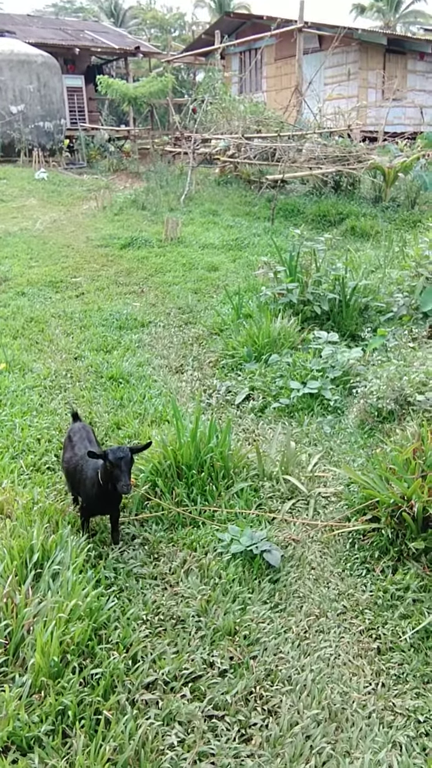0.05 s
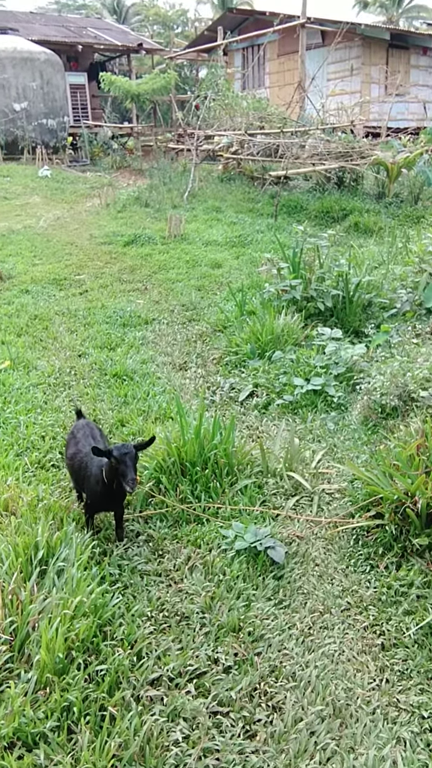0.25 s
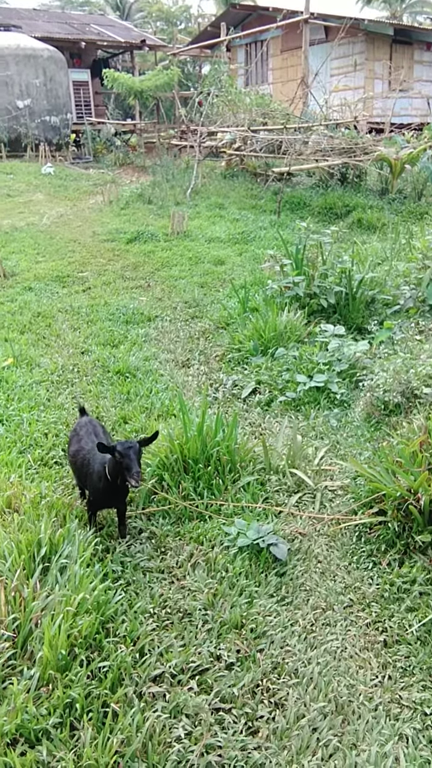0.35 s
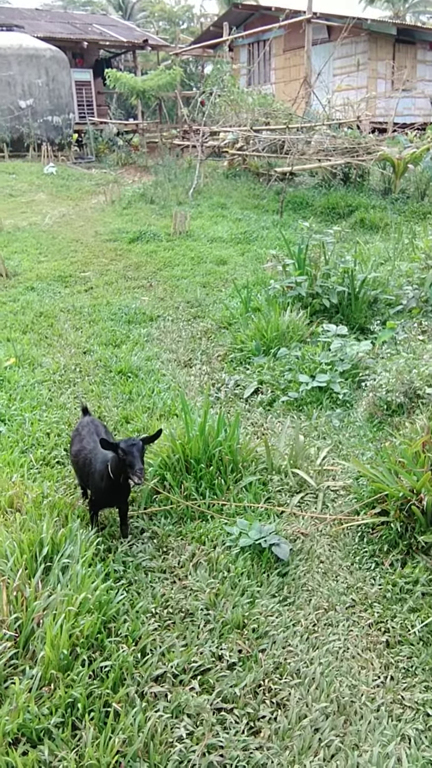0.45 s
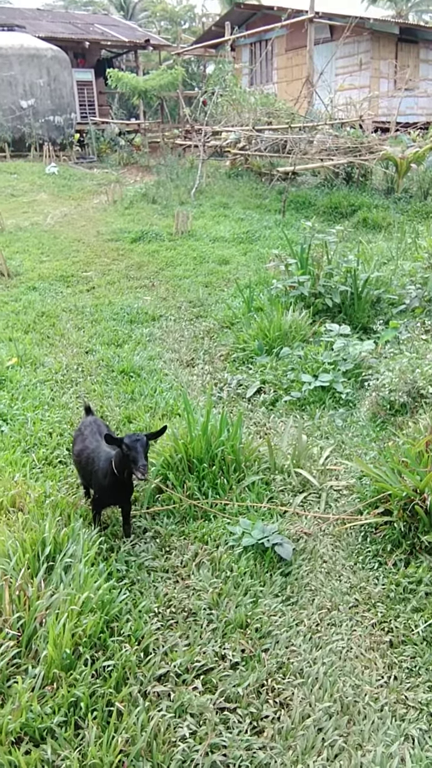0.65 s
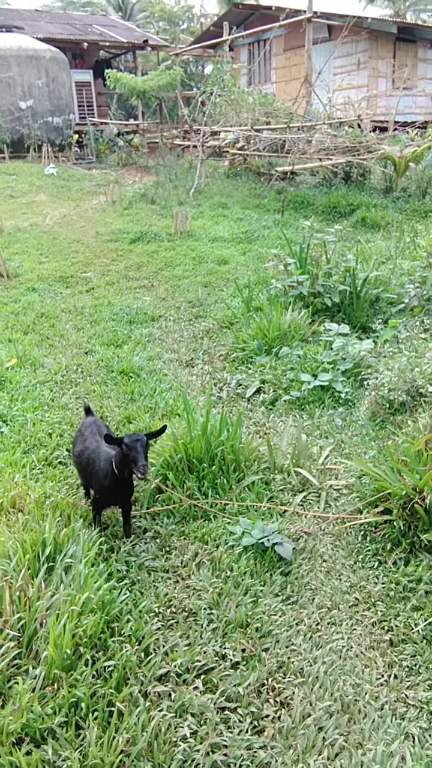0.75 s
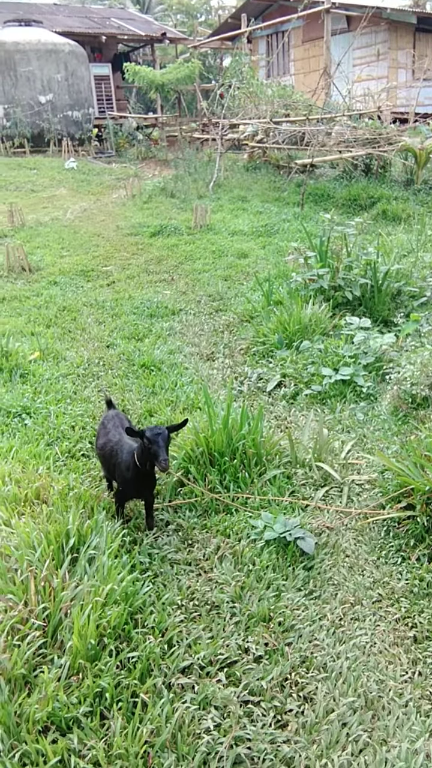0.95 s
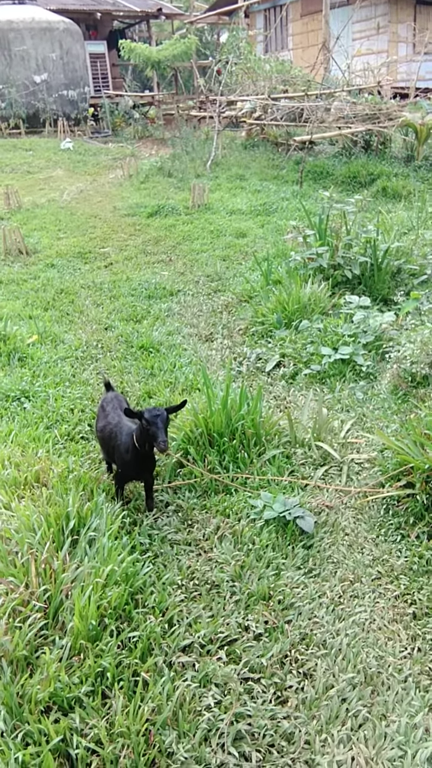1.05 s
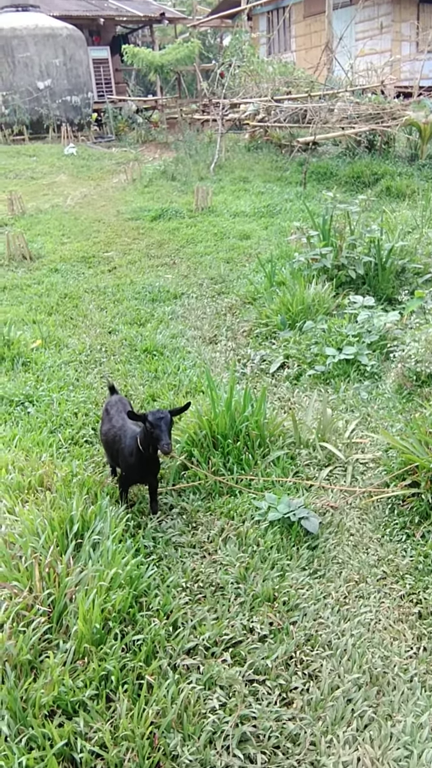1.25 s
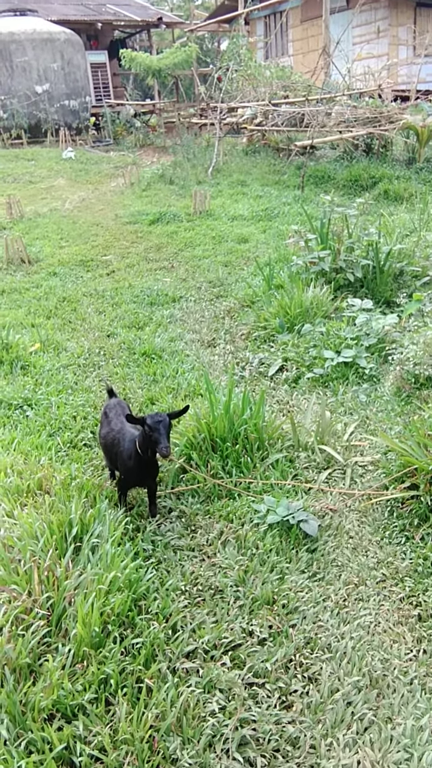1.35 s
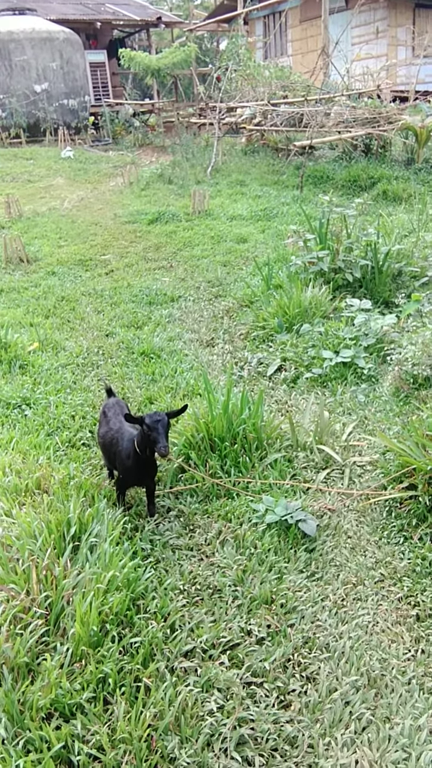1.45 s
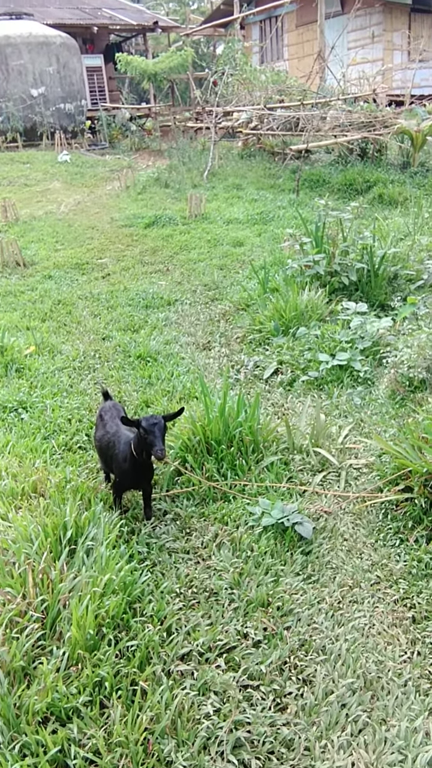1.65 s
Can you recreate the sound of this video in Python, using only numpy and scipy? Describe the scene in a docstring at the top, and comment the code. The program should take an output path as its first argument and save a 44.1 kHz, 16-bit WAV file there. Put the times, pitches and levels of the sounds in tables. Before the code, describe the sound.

A young goat bleats once, loud and nasal, rising then falling with hoarse edges, close to the microphone on an open lawn; insects chirp before it, sink beneath it, then return with faint rustles and hiss.

```python
"""On a lawn, insects chirp and buzz over a low rumble; both sink as a young goat starts one long bleat.
Its pitch arches, its mouth opens and closes, and it turns hoarse at the start, in mid-call and at the end:
vocal pulses and puffs of air ring a moving throat, and the yard answers faintly as a noise tail.
A dry swish and a rustle follow, then a faint falling whistle made of many sines, and a soft bump.
Insects and rumble come back up and a hiss in several bands rises, with a far hoot and a last rustle."""
import sys
import numpy as np
from scipy import signal
from scipy.fft import rfft, irfft
from scipy.io import wavfile
from scipy.ndimage import map_coordinates

SR = 44100
rng = np.random.default_rng(int(sys.argv[2]) if len(sys.argv) > 2 else 0)


def master_out(mix):
    """Clip the mix to full scale and print it as 16-bit PCM to the path in sys.argv[1]."""
    frames = np.transpose(np.atleast_2d(mix))
    ceiling = np.clip(frames, -1, 1)
    pcm = np.round(ceiling * 32767).astype(np.int16)
    wavfile.write(sys.argv[1], SR, pcm)


N = 74970
T = np.arange(N) / SR

# pitch of the goat: t/s, f/Hz
GOAT_PITCH = [(.15,278),(.16,287),(.175,314),(.192,360),(.21,378),(.23,407),(.25,431),(.275,452),(.3,463),(.35,480),(.46,487),(.52,485),(.541,488),(.55,479),(.563,484),(.573,497),(.592,477),(.622,478),(.645,461),(.665,458),(.705,467),(.725,457),(.75,428),(.767,412),(.78,393),(.8,390),(.82,372),(.835,370),(.845,346),(.88,340)]
# hoarseness: t/s, level/dB re the voice, before its colour
RASP_LEVEL = [(.15,-15),(.21,-22),(.232,-17),(.26,-26),(.4,-36),(.53,-36),(.541,-18),(.577,-18),(.6,-34),(.635,-24),(.68,-32),(.72,-32),(.755,-26),(.77,-20),(.79,-27),(.825,-26),(.85,-13)]
# colour of the hoarse breath: f/Hz, level/dB
BREATH_COLOUR = [(250,-25.5),(700,-17),(1000,3),(2500,-6.5),(4000,-11),(5000,9),(6500,8.5),(8000,8.5),(11000,12),(15000,-2)]
START_S, STOP_S, ATTACK_S, RELEASE_S = 0.1486, .86, 0.0098, 0.0089
# pitch and level unsteadiness at full rasp; puff decay in pitch periods; constant relative pitch waver
JITTER, SHIMMER, PUFF_TURNS, WAVER = .06, .4, 0.71, .001


def bleat(size=512, count=44):
    """Sharp vocal pulses and puffs of air ring the moving throat; hoarseness unsettles the pulses."""
    hop = size // 4
    rasp = amp(curve(RASP_LEVEL, T))
    pitch = curve(GOAT_PITCH, T) * (1 + WAVER * wander(60) + JITTER * rasp * wander(254))
    turns = np.cumsum(pitch) / SR

    # breath is strongest at the start of each vocal period
    puff_level = .5 + np.exp(-(turns % 1) / PUFF_TURNS)
    puffs = unit(puff_level * rng.standard_normal(N))
    hz, t, spectrum = signal.stft(puffs, SR, nperseg=size, noverlap=size - hop)
    gain = throat(t[None], hz[:, None])
    # the root gives each harmonic's share of the band the power of one harmonic
    per_harmonic = np.sqrt(SR / 2 / curve(GOAT_PITCH, t))
    spectrum = spectrum * gain * amp(shape(BREATH_COLOUR, hz))[:, None] * per_harmonic
    air = rasp * signal.istft(spectrum, SR, nperseg=size, noverlap=size - hop)[1][:N]

    # minimum phase: the throat's phase follows from its log gain around the full frequency circle
    log_gain = np.log(np.vstack([gain, gain[-2:0:-1]]))
    phase = -signal.hilbert(log_gain, axis=0).imag
    on = np.flatnonzero((T > START_S) & (T < STOP_S + 10 * RELEASE_S))
    voice = np.zeros(N)
    for k in range(1, count):
        at = [k * pitch[on] * size / SR, on / hop]
        if k == 1:
            level = amp(curve(VOICE_EDGES, T[on]))
        else:
            level = np.exp(map_coordinates(log_gain, at, order=1))
        angle = 2 * np.pi * k * turns[on] + map_coordinates(phase, at, order=1)
        voice[on] += np.sqrt(2) * level * np.cos(angle)

    attack = np.clip((T - START_S) / ATTACK_S, 0, 1)
    release = np.exp(-np.maximum(T - STOP_S, 0) / RELEASE_S)
    return attack * release * (voice * (1 + SHIMMER * rasp * wander(150)) + air)


# five throat resonances: t/s, then f/Hz and level/dB of each
THROAT_PEAKS = [(0.155, 700, -51, 1850, -42, 3400, -49, 4090, -47, 5470, -55),
                (0.188, 574, -40.5, 1880, -33.5, 3440, -43, 3900, -36, 4220, -48),
                (0.21, 736, -21, 2020, -21.5, 3260, -21, 4480, -24.5, 5740, -31),
                (0.228, 1020, -25, 2410, -21, 3040, -20, 3980, -22.5, 5400, -28.5),
                (0.252, 1180, -27.5, 2000, -20, 3115, -15, 3697, -19.5, 5370, -26),
                (0.285, 1203, -30.5, 2196, -12.5, 3000, -28.5, 3880, -16, 5740, -34),
                (0.35, 965, -34, 2280, -16, 2985, -17, 3966, -25, 5120, -30.5),
                (0.44, 950, -34, 2346, -21.5, 3105, -15, 3810, -20.5, 5900, -34),
                (0.6, 1040, -32, 2334, -23.5, 3115, -15.5, 3923, -20.5, 5800, -33.5),
                (0.655, 1030, -37.5, 2250, -17, 3000, -20.5, 3720, -32, 5250, -31),
                (0.722, 982, -37, 2443, -17, 3260, -21.5, 3760, -32, 5250, -31.5),
                (0.748, 1394, -45, 1964, -17.5, 3430, -28.5, 4010, -15.5, 5580, -32.5),
                (0.768, 1404, -24.5, 2046, -26.5, 3110, -17, 3710, -24, 5300, -31),
                (0.79, 1365, -35.5, 2570, -30, 3360, -36, 3944, -24.5, 5680, -32.5),
                (0.84, 983, -28.5, 1810, -24.5, 3246, -27.5, 3800, -28, 4990, -35.5),
                (0.858, 960, -58.5, 1920, -48, 3084, -59, 3964, -35, 6010, -43)]
# their half widths at -6 dB: f/Hz
PEAK_WIDTHS = [222.8, 222, 249, 158, 533]
# the highest resonance: t/s, f/Hz, level/dB
HIGHEST_PEAK = [(.16,6800,-55),(.225,6400,-29.5),(.255,7700,-37),(.29,6900,-38),(.35,7200,-36.5),(.43,6770,-38.5),(.53,7060,-40),(.6,7500,-39),(.66,7100,-36.5),(.72,7500,-39),(.755,6850,-33.5),(.8,6730,-34.5),(.85,6600,-45)]
HIGH_WIDTH_HZ = 380
# edges of the voice: t/s, fundamental level/dB, then level/dB added to the treble and top colours
VOICE_EDGES = [(.155,-69.5,-64,-78),(.187,-49,-49.5,-72),(.22,-50.5,-37,-61),(.3,-44.5,-40.5,-67),(.38,-45.5,-42,-81.5),(.52,-46.5,-47,-82),(.56,-46,-42,-72),(.74,-52.5,-37,-61.5),(.795,-72,-40,-62.5),(.825,-53,-54.5,-62.5),(.86,-70,-54.5,-63.5)]
# treble colour of the voice: f/Hz, level/dB
TREBLE_COLOUR = [(4500,-35),(6300,-23),(7000,-16.5),(7700,-8.5),(8300,-5.5),(9100,-17),(10100,-20),(10700,-43),(15500,-60.5)]
# top colour of the voice: f/Hz, level/dB
TOP_COLOUR = [(8000,-19.5),(9200,-14),(10050,3),(10800,-1.5),(12200,-3.5),(13200,-10.5),(14600,-8.5),(15500,-17.5)]
# small resonances ripple the treble and shift with the highest peak
RIPPLE_DB, RIPPLE_HZ, RIPPLE_FROM_HZ = 3, 1250, 6500
# the throat's dead spot
NOTCH_HZ, NOTCH_WIDTH_HZ, NOTCH_DB = 4540, 230, -2.5


def throat(t, hz):
    """Gain of the throat at times t and frequencies hz: six moving peaks, a notch and rippled treble."""
    high = curve(HIGHEST_PEAK, t)
    ripple_growth = np.clip(hz / RIPPLE_FROM_HZ, 0, 1) ** 4
    ripple = RIPPLE_DB * np.cos(2 * np.pi * (hz - high) / RIPPLE_HZ) * ripple_growth
    treble = amp(curve(VOICE_EDGES, t, axis=2) + shape(TREBLE_COLOUR, hz) + ripple)
    top = amp(curve(VOICE_EDGES, t, axis=3) + shape(TOP_COLOUR, hz) + ripple)
    power = treble ** 2 + top ** 2
    peaks = [(curve(THROAT_PEAKS, t, axis=2 * k + 1), curve(THROAT_PEAKS, t, axis=2 * k + 2), width)
             for k, width in enumerate(PEAK_WIDTHS)]
    peaks.append((high, curve(HIGHEST_PEAK, t, axis=2), HIGH_WIDTH_HZ))
    for centre, db, width in peaks:
        power = power + (amp(db) / (1 + ((hz - centre) / width) ** 2)) ** 2
    notch = amp(NOTCH_DB * np.exp(-((hz - NOTCH_HZ) / NOTCH_WIDTH_HZ) ** 2))
    return np.sqrt(power) * notch


# tail from the houses: f/Hz, level/dB summed over the decay (before its fade-in), t60/s
YARD_TAIL = [(300,-34,.55),(700,-28.5,.4),(950,-18.5,0.44),(1290,-24.5,0.57),(2000,-21,.58),(3400,-20,0.87),(4500,-18,.42),(6000,-10.5,0.27),(8500,-17,0.26),(15000,-13.5,.33)]
# early scatter: summed level; it is densest at half of ECHO_S
ECHO_DB, ECHO_S = -25, 0.06


def yard(x, size=256):
    """Quick scatter from the ground and plants, then a faint tail from the houses."""
    t = T[:SR]
    hz, at, spectrum = signal.stft(rng.standard_normal(SR), SR, nperseg=size)
    t60 = shape(YARD_TAIL, hz, axis=2)[:, None]
    decay = amp(shape(YARD_TAIL, hz)[:, None] - 60 * at / t60)
    unit_energy = np.sqrt(2 * np.log(1000) / t60 / SR)
    tail = signal.istft(spectrum * decay * unit_energy, SR, nperseg=size)[1][:SR]
    tail = tail * np.minimum(t / 0.01, 1)
    early = rng.standard_normal(SR) * t * np.exp(-2 * t / ECHO_S)
    early = amp(ECHO_DB) * early / np.linalg.norm(early)
    return signal.fftconvolve(x, tail + early)[:N]


# both choruses: t/s, level/dB before CHORUS_DB and SECOND_DB
CHORUS_LEVEL = [(0,-34.5),(.13,-37),(.25,-47),(.6,-52),(.95,-58),(1.1,-52.5),(1.22,-47),(1.42,-37),(1.55,-40.5),(1.7,-34.5)]
CHIRP_HZ, CHIRPS_PER_S, CHIRP_SPREAD_HZ, CHORUS_DB = 6990, 180, 130, -5.5
SECOND_HZ, SECOND_PER_S, SECOND_DB = 7692, 82, -18
CHIRP_S = .003  # half length
# the strongest chirps, close by: t/s, peak level/dB
CLOSE_CHIRPS = [(.015,-31),(.066,-27),(.085,-30),(.131,-31),(1.151,-38),(1.212,-40),(1.228,-39),(1.427,-30),(1.538,-27),(1.553,-29),(1.606,-31),(1.621,-31)]


def chirping_insects():
    """Two chirping choruses and a few close chirps, all of brief wing strokes."""
    first = chorus(CHIRP_HZ, CHIRPS_PER_S, CHIRP_SPREAD_HZ, CHIRP_S, uneven_db=1.5)
    second = chorus(SECOND_HZ, SECOND_PER_S, spread_hz=57, length=0.0034, uneven_db=6)
    far = amp(CHORUS_DB) * first + amp(SECOND_DB) * second
    near = sum(amp(db) * chirp(s, CHIRP_HZ, CHIRP_S) for s, db in CLOSE_CHIRPS)
    return far * amp(curve(CHORUS_LEVEL, T)) + near


def chorus(hz, per_s, spread_hz, length, uneven_db):
    """Irregular wing strokes of several insects near one pitch."""
    draws = rng.standard_normal((int(np.ceil(per_s * N / SR)), 3))
    strokes = np.zeros(N)
    for k, (late, sharp, loud) in enumerate(draws):
        time = (k + .5 * late) / per_s
        strokes += amp(uneven_db * loud) * chirp(time, hz + spread_hz * sharp, length)
    return unit(strokes)


def chirp(time, hz, length):
    """One wing stroke: a brief swelling tone."""
    out = np.zeros(N)
    near = abs(T - time) < length * np.pi
    u = T[near] - time
    out[near] = np.exp(-(u / length) ** 2) * np.sin(2 * np.pi * hz * u)
    return out


# colour of the buzz: f/Hz, level/dB
BUZZ_COLOUR = [(8900,-25.5),(9250,-13.5),(9500,7.5),(9800,-0.5),(10050,-1),(10800,0.5),(11450,-6),(11800,-34),(13000,-26.5),(16000,-40)]
# level of the buzz: t/s, level/dB
BUZZ_FADER = [(0,-57),(.15,-58.5),(.5,-80),(1.0,-85),(1.25,-72),(1.42,-58.5),(1.7,-56.5)]
BUZZ_RATE_HZ, BUZZ_DEPTH = 111, 0.15


def buzzing_insect():
    """A high band of noise that pulses at a steady rate."""
    pulse = 1 + BUZZ_DEPTH * np.sin(2 * np.pi * BUZZ_RATE_HZ * T)
    # the added first row keeps the buzz out of the lower range
    return noise([(7000, -70.5)] + BUZZ_COLOUR) * pulse * amp(curve(BUZZ_FADER, T))


# a faint falling whistle: t/s, f/Hz, level/dB, half width f/Hz
FALLING_WHISTLE = [(1.12,2420,-73,20.4),(1.21,2370,-49.5,26.4),(1.28,2250,-53.5,69),(1.34,2080,-52,160),(1.42,1850,-58.5,190),(1.5,1800,-86,220)]


def falling_whistle(count=40):
    """A faint falling whistle whose many sines spread into a breathy band."""
    centre = np.cumsum(curve(FALLING_WHISTLE, T)) / SR
    spread = np.cumsum(curve(FALLING_WHISTLE, T, axis=3)) / SR
    tone = unit(sum(np.sin(2 * np.pi * (centre + offset * spread + rng.random()))
                    for offset in np.linspace(-1, 1, count)))
    sounding = (T > FALLING_WHISTLE[0][0]) * (T < FALLING_WHISTLE[-1][0])
    return tone * amp(curve(FALLING_WHISTLE, T, axis=2)) * sounding


# faint far hoots: t/s, half length t/s, f/Hz, peak level/dB
FAR_HOOTS = [(1.603,0.031,650,-60.5)]


def hoot():
    """A plain sine that swells and fades."""
    return sum(swell(s, length, db) * np.sin(2 * np.pi * hz * T) for s, length, hz, db in FAR_HOOTS)


# soft rustles in the grass: t/s, half length t/s, level/dB
GRASS_RUSTLES = [(0.924,0.025,-56.5),(1.662,0.019,-51.5)]
# their colour: f/Hz, level/dB
GRASS_COLOUR = [(200,-22),(450,-12.5),(650,3.5),(950,2),(1400,-9),(4000,-14.5),(9000,-44)]
# a short dry swish: t/s, half length t/s, level/dB
DRY_SWISH = (.9,.018,-47)
# its colour: f/Hz, level/dB
DRY_COLOUR = [(1500,-20.5),(4500,-14),(6400,1),(7600,-22),(11000,-21),(14000,-35)]
# a soft low bump: t/s, half length t/s, level/dB
LOW_BUMP = (1.375,.014,-59)
# its colour: f/Hz, level/dB
LOW_COLOUR = [(60,-12.5),(200,2),(300,4.5),(450,-34),(900,-50)]


def small_sounds():
    """Rustles, a swish and a bump: short swells of coloured noise."""
    rustles = noise(GRASS_COLOUR) * sum(swell(*row) for row in GRASS_RUSTLES)
    swish = noise(DRY_COLOUR) * swell(*DRY_SWISH)
    bump = noise(LOW_COLOUR) * swell(*LOW_BUMP)
    return rustles + swish + bump


# colour of the low rumble: f/Hz, level/dB
RUMBLE_COLOUR = [(20,-32.5),(42,-34),(60,-16.5),(80,-4),(96,-15.5),(114,4.5),(135,-9),(200,-14),(280,-23),(400,-49),(800,-65)]
# its level: t/s, level/dB
RUMBLE_FADER = [(0,-53),(.16,-52),(.3,-65.5),(.42,-97),(.88,-91.5),(1.0,-74),(1.07,-67.5),(1.33,-73),(1.44,-52.5),(1.7,-56)]


def rumble():
    """Low noise that sinks away during the bleat."""
    return noise(RUMBLE_COLOUR) * amp(curve(RUMBLE_FADER, T))


# colour of the open-air hiss: f/Hz, level/dB
AIR_COLOUR = [(100,-15),(500,-23),(1200,-20),(1500,-18.5),(1750,6.5),(2400,8),(2620,-16),(2850,-3),(3000,-8.5),(3200,3),(3550,-21),(4100,5),(4600,-23),(5200,-20),(5800,1),(6500,-9),(9000,-21.5)]
# its level: t/s, level/dB
AIR_FADER = [(0,-77),(.9,-70.5),(1.28,-84),(1.37,-62.5),(1.45,-51),(1.6,-59.5),(1.7,-59.5)]


def open_air():
    """Hiss in several bands, strongest after the bleat."""
    return noise(AIR_COLOUR) * amp(curve(AIR_FADER, T))


def amp(db):
    """Amplitude of a level in dB."""
    return 10 ** (np.asarray(db) / 20)


def unit(x):
    """Scale to an RMS of one."""
    return x / np.sqrt(np.mean(abs(x) ** 2) + 1e-20)


def curve(table, t, axis=1):
    """One column of a table, joined by straight lines."""
    rows = np.array(table, float)
    return np.interp(t, np.sort(rows[:, 0]), rows[:, axis])


def shape(table, hz, axis=1):
    """One column of a spectrum on a log-frequency axis."""
    rows = np.array(table, float)
    return np.interp(np.log(hz + 1), np.log(rows[:, 0]), rows[:, axis])


def noise(colour):
    """Steady noise of a given spectrum."""
    gain = amp(shape(colour, np.fft.rfftfreq(N, 1 / SR)))
    return unit(irfft(rfft(rng.standard_normal(N)) * gain, N))


def wander(rate_hz):
    """Smooth chance up to a given rate."""
    gain = np.exp(-(np.fft.rfftfreq(N, 1 / SR) / rate_hz) ** 2)
    return unit(irfft(rfft(rng.standard_normal(N)) * gain, N))


def swell(s, length, db):
    """A bell-shaped rise and fall."""
    return amp(db) * np.exp(-((T - s) / length) ** 2)


def scene():
    """The goat and its yard, then insects, whistle and background, alike in both channels."""
    goat = bleat()
    mono = goat + yard(goat)
    mono += chirping_insects() + buzzing_insect()
    mono += falling_whistle() + hoot()
    mono += small_sounds() + rumble() + open_air()
    return np.array([mono, mono])


CUT_HZ = 15600


def record(dry):
    """The recorder's band limit: a steep low-pass."""
    low_pass = signal.firwin(511, CUT_HZ, window=("kaiser", 9), fs=SR)
    return signal.oaconvolve(dry, low_pass[None], "same")


dry = scene()
out = record(dry)
master_out(out)
```